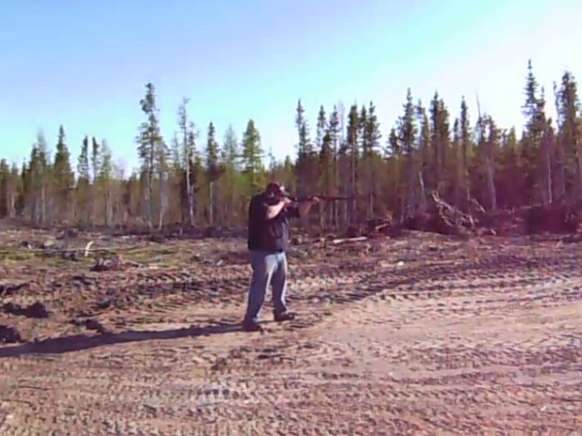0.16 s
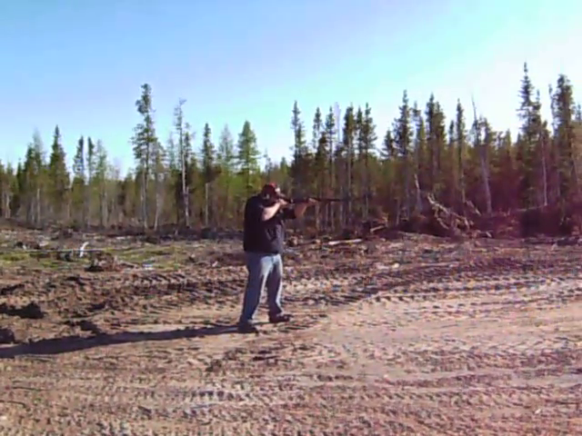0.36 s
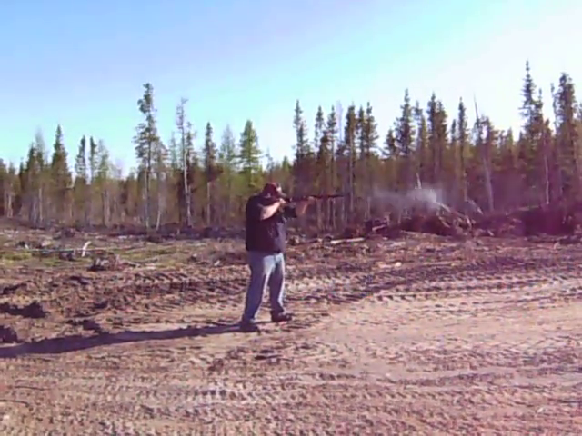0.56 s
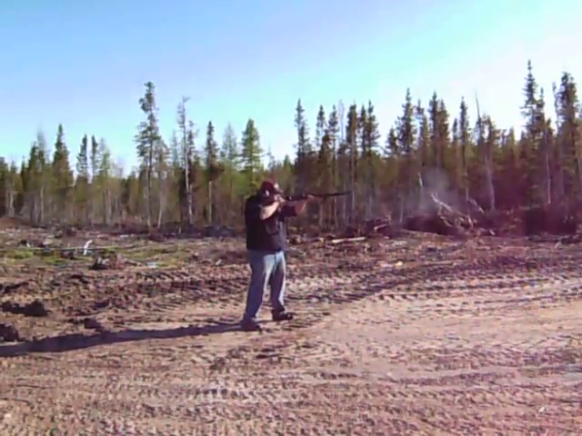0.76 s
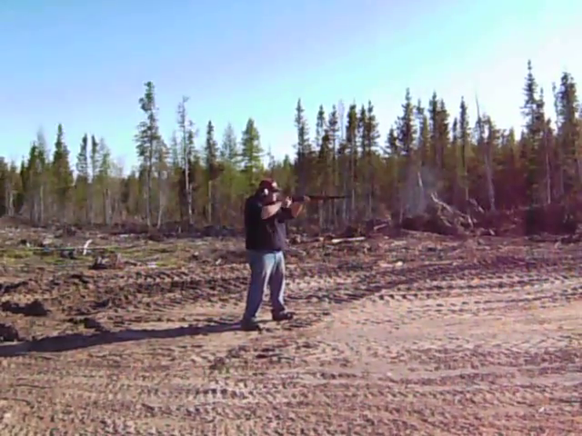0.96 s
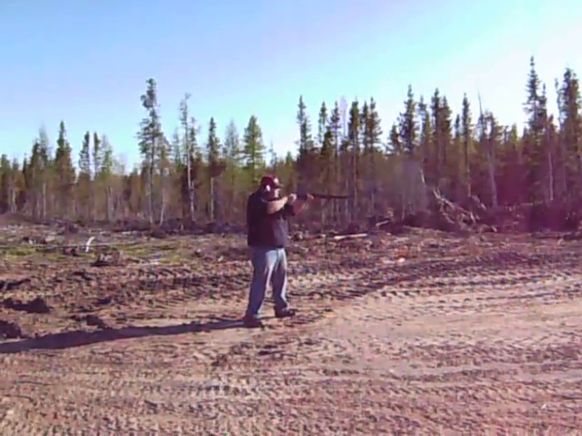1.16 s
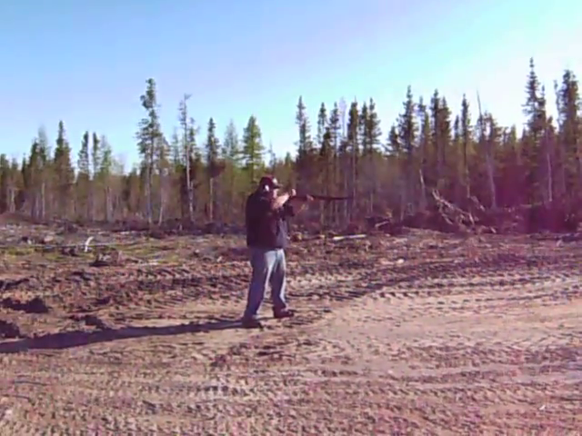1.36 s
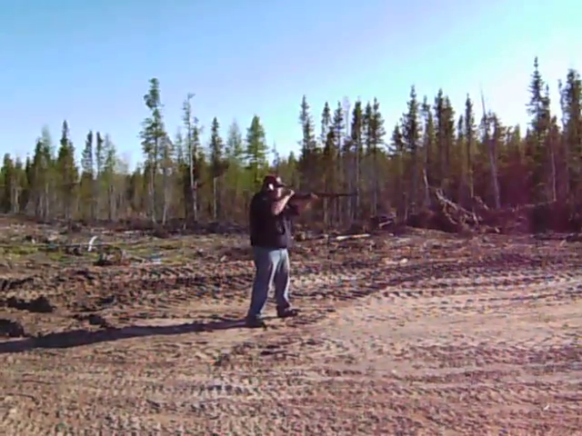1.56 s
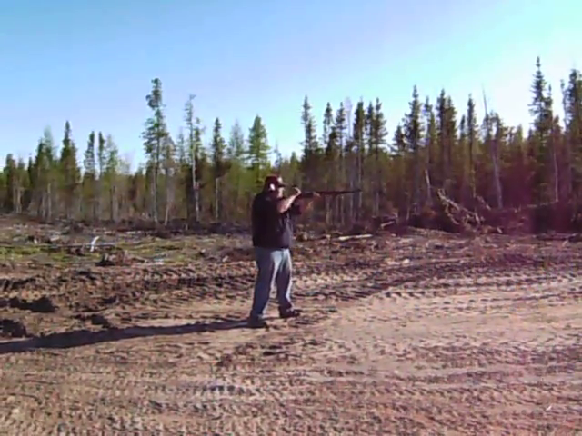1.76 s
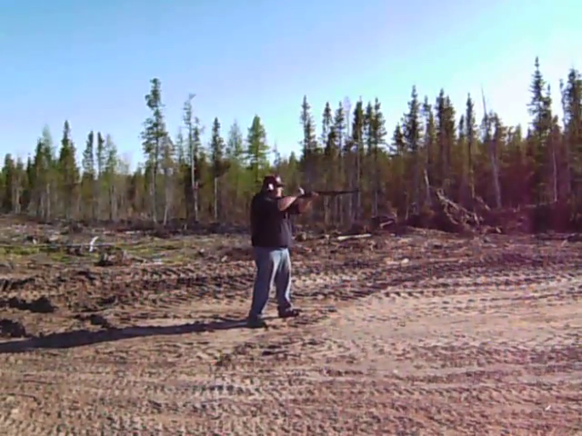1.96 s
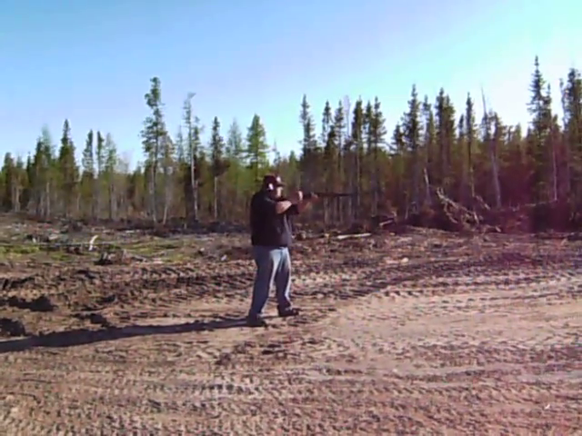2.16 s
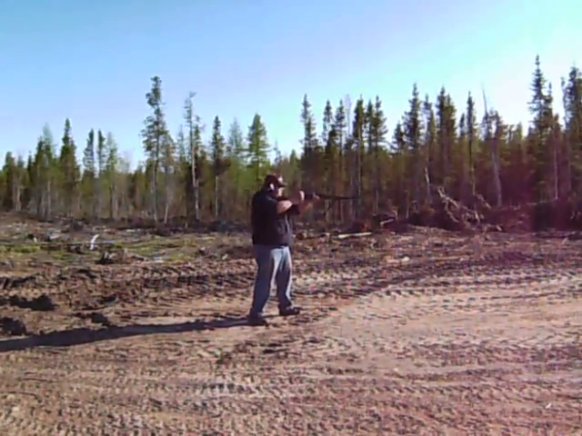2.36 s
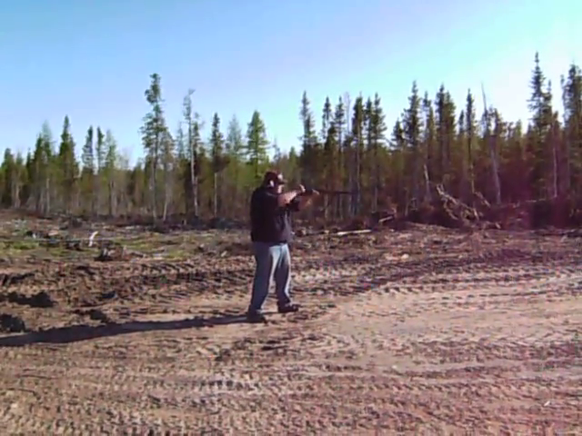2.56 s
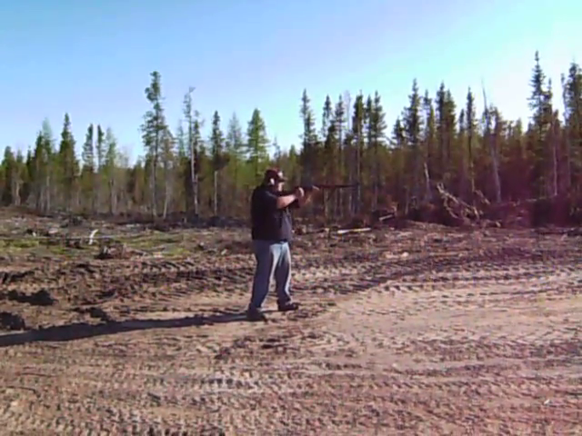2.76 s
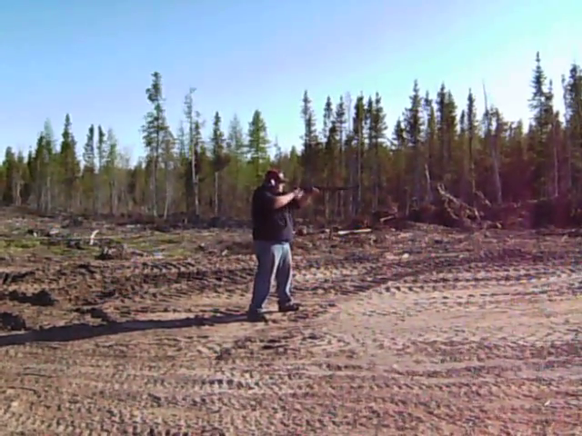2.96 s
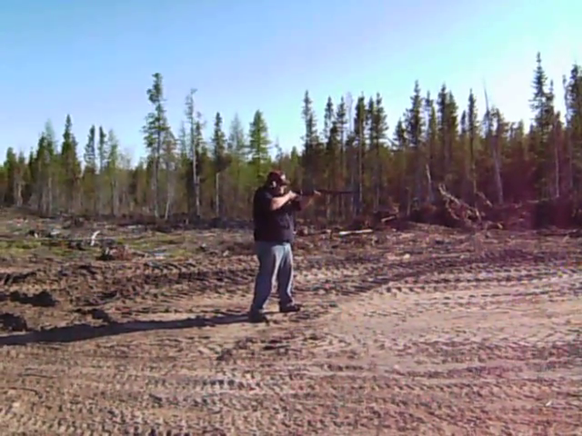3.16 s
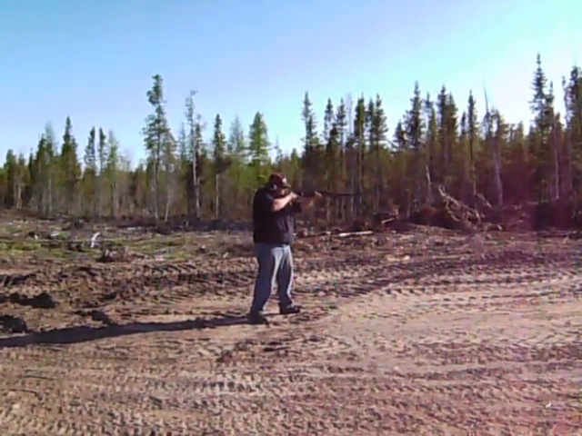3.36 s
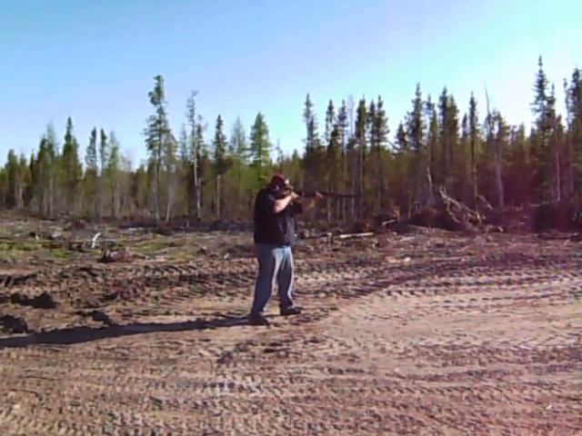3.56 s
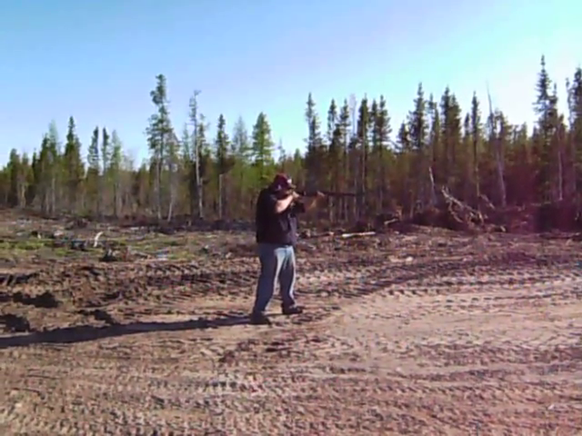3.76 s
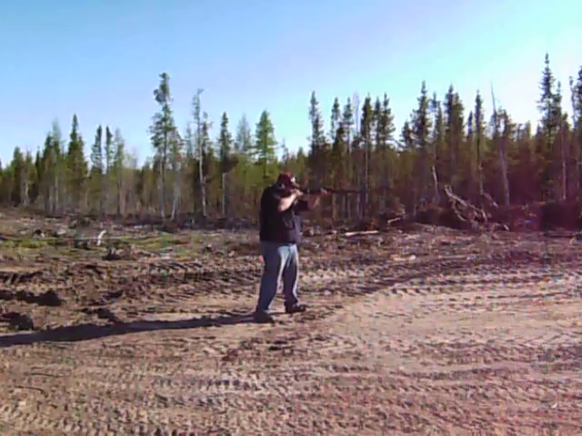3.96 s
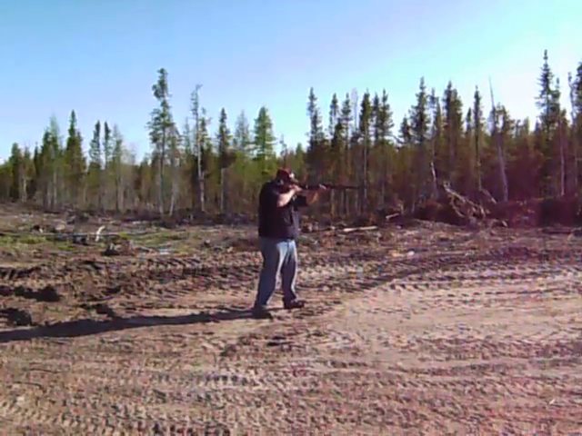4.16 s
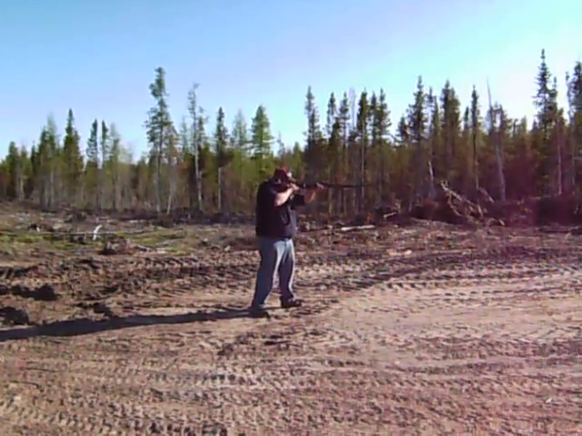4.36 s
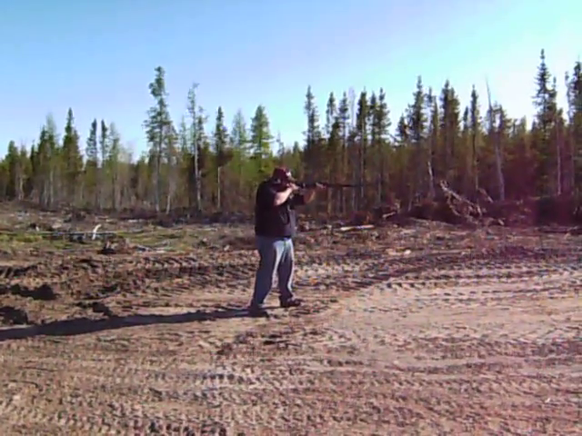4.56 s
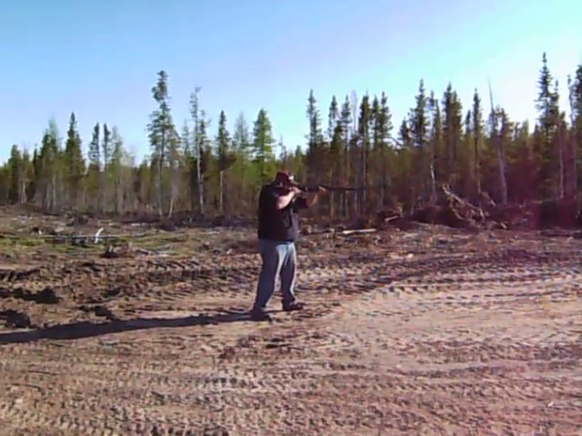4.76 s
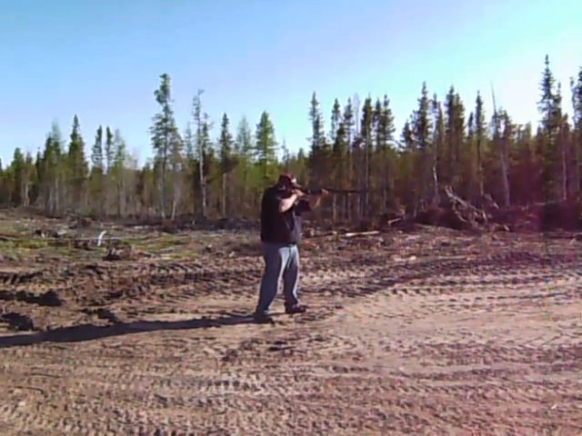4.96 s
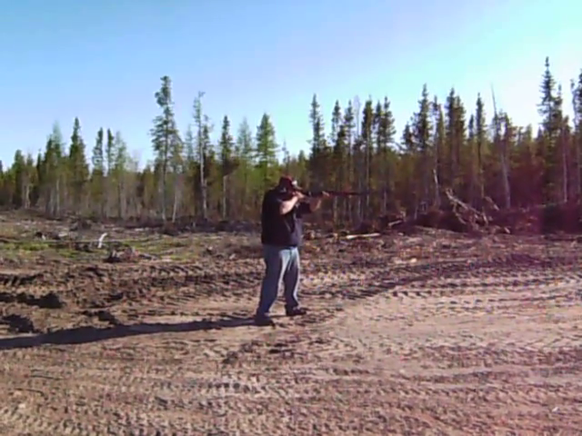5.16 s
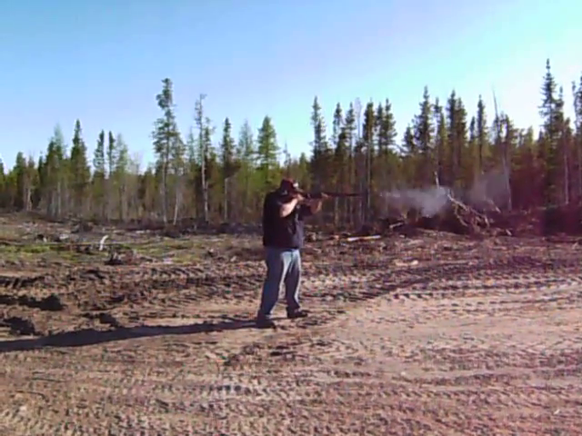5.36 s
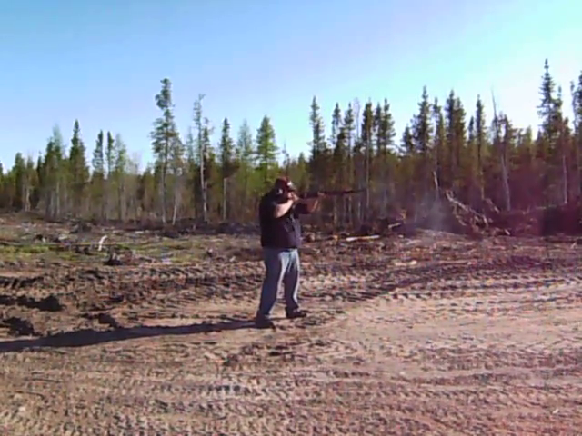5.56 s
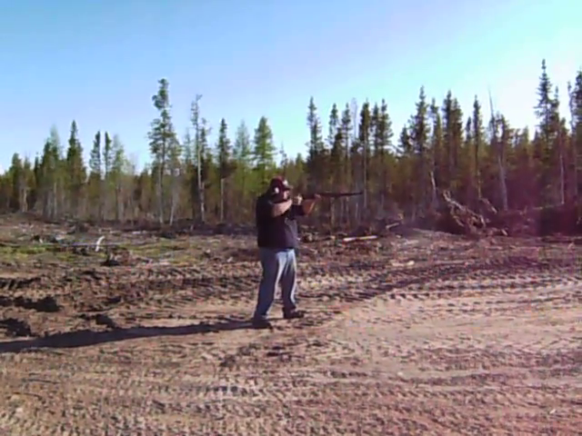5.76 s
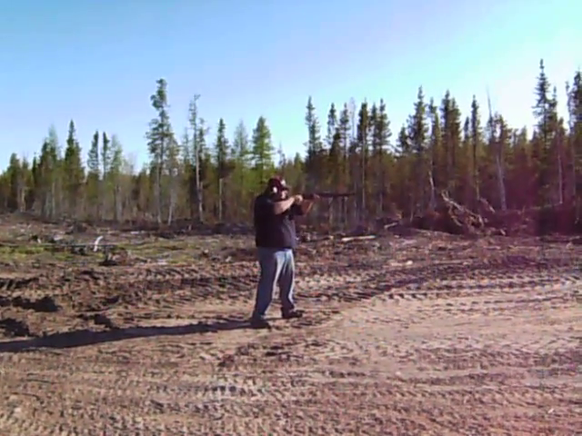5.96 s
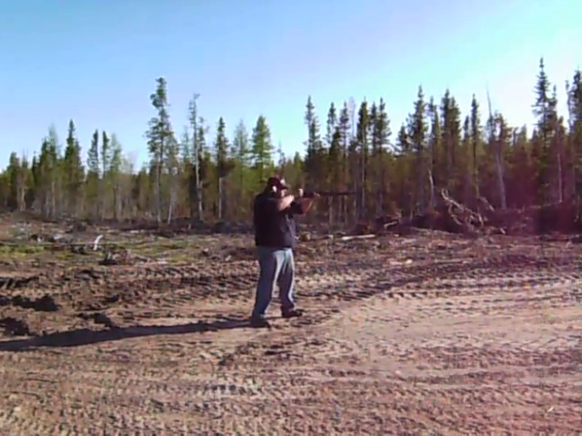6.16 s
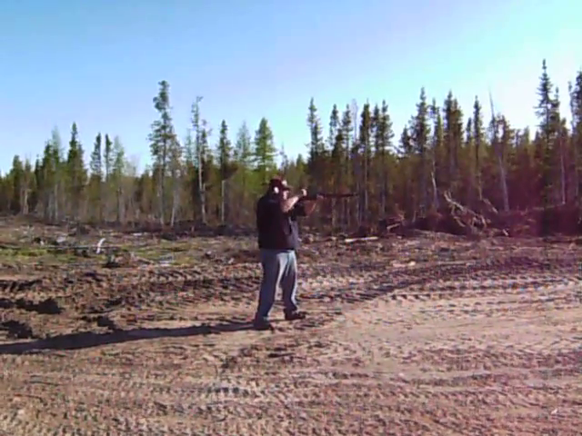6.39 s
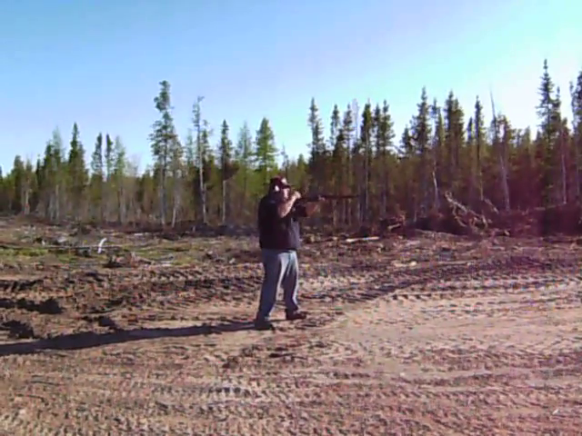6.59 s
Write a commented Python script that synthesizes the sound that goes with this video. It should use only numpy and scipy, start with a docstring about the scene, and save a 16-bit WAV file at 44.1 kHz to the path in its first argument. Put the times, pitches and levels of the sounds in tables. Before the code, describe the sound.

A rifle fires twice in a forest clearing, echoes rolling off the trees, its bolt clacking after each shot as wind buffets the microphone.

```python
"""A forest clearing: two rifle shots, some ten metres from a small microphone that overloads on the blast.
Turbulent muzzle gas makes the crack, the ground booms, and the tree line scatters back a long grainy
roll with a few distinct echoes. After each shot the steel bolt knocks and slides. Wind buffets the
microphone over its own hiss, and two faint bird whistles sound between the shots."""
import sys
import numpy as np
from scipy import signal
from scipy.fft import rfft, irfft
from scipy.io import wavfile
from scipy.ndimage import uniform_filter1d

SR = 44100
rng = np.random.default_rng(int(sys.argv[2]) if len(sys.argv) > 2 else 0)


def to_wav(s):
    """Save 16-bit WAV."""
    ch = np.atleast_2d(s).T  # columns
    pcm = np.round(np.clip(ch, -1, 1) * 32767)  # PCM
    wavfile.write(sys.argv[1], SR, pcm.astype(np.int16))


N = 292383
T = np.arange(N) / SR

# pressure pulses of the wind: (t/s, peak level/dB, relative level of the sharp edge/dB)
WIND_POPS = [(1.745, -31.5, -25), (2.02, -28, -17), (4.32, -48, -19), (4.753, -45, -25), (6.55, -38.5, -26),
             (0.279, -42.5, -27), (0.368, -45, -24), (1.974, -25.5, -24), (2.055, -31, -4),
             (2.143, -33.5, -15), (2.223, -31.5, -15), (2.434, -31.5, -7), (2.474, -30, -27),
             (2.866, -39.5, -19.5), (3.216, -29, 14), (3.244, -35, -10), (3.292, -39, -21),
             (3.332, -31, -15), (3.376, -28, -13), (3.429, -32, -3), (3.481, -28.5, -13), (3.556, -22, -16),
             (3.888, -36, -28), (3.92, -49, -21.5), (4.045, -32, -12), (4.103, -33, -16),
             (4.171, -42, -12.5), (4.387, -45, -26), (4.434, -47, -22.5), (4.622, -39, -23),
             (4.838, -23.5, -7.5), (5.226, -36, -29.5), (6.279, -28.5, -8)]


def undb(db):
    return 10 ** (np.asarray(db) / 20)


def unit(x):
    return x / np.sqrt(np.mean(x ** 2))


def peak(x):
    return x / np.max(np.abs(x))


def band(x, lo_hz, hi_hz, order=2):
    return signal.sosfilt(signal.butter(order, [lo_hz, hi_hz], "band", fs=SR, output="sos"), x)


def below(x, hz):
    """Zero-phase low-pass: subtracting it from x leaves the upper band."""
    return signal.sosfiltfilt(signal.butter(3, hz, fs=SR, output="sos"), x)


def colour(x, points):
    """Spectral shaping by (f/Hz, level/dB) points."""
    hz, db = np.transpose(points)
    f = np.fft.rfftfreq(len(x), 1 / SR) + 1
    return irfft(rfft(x) * undb(np.interp(np.log(f), np.log(hz), db)), len(x))


def grains(rate, spread_db):
    """Poisson impulses of random sign, a few much larger than the rest."""
    chance, sign, size = rng.random((3, N))
    return unit((chance < rate / SR) * np.sign(sign - .5) * undb(-spread_db * np.log(1 - .98 * size)))


def flicker(rate, depth_db):
    """Random modulation: a gain that wanders rate times a second."""
    hold = int(SR / rate)
    steps = np.repeat(rng.standard_normal(N // hold + 1), hold)
    return undb(depth_db * uniform_filter1d(steps, hold)[:N])


def add(out, start, x):
    i = int(start * SR)
    out[i:i + len(x)] += x[:N - i]


def hiss():
    """Self-noise: the microphone adds a steady, coloured noise floor."""
    # noise spectrum: (f/Hz, level/dB)
    spectrum = [(240, -27), (400, -10), (540, -2), (958, -5), (1260, -6), (3490, -5.5), (3940, -9),
                (4400, -28.5), (5720, -76.5), (9680, -120)]
    return undb(-67) * unit(colour(rng.standard_normal(N), spectrum))


def wind():
    """Turbulent pressure at the microphone port: a rumble and a rasp, brighter the harder it blows."""
    # gust strength: (t/s, base level of the rasp/dB)
    gusts = [(0, -85), (.24, -75), (.29, -60), (.48, -64.5), (1.0, -54.5), (1.45, -66.5), (1.75, -45.5),
             (2.0, -47.5), (2.48, -48.5), (2.58, -77.5), (2.8, -80), (2.9, -48.5), (3.08, -68.5),
             (3.2, -51.5), (3.4, -44), (3.56, -47), (3.64, -61), (3.85, -60.5), (4.07, -56.5), (4.4, -63),
             (4.55, -67), (4.72, -68), (4.97, -54), (5.03, -68), (5.1, -56), (5.27, -65.5), (6.1, -58.5),
             (6.63, -64)]
    reference_db, swell_db, swell_s = -48, 5.5, .023
    swells = np.max([np.exp(-((T - at) / swell_s) ** 2) for at, *_ in WIND_POPS], axis=0)
    gust_db = np.interp(T, *np.transpose(gusts)) - reference_db + swell_db * swells
    # rumble spectrum: (f/Hz, level/dB)
    spectrum = [(8.8, -26), (15, -4), (27, -1), (86, -4), (128, -8), (200, -14), (260, -40), (440, -120)]
    puffs = flicker(14, 2.6)
    rumble = unit(colour(rng.standard_normal(N), spectrum) * flicker(25, 1))
    flutter, eddies = flicker(70, 2.7), grains(600, 7.5)
    rasp = unit(below(band(eddies * flutter, 120, 340), 1100))
    edge = unit(below(band(eddies * flutter ** 2.9, 400, 800), 1200))
    return puffs * (undb(-44 + .6 * gust_db) * rumble
                    + undb(reference_db + gust_db) * rasp
                    + undb(-60.5 + 1.3 * gust_db) * edge)


def bolt_knocks():
    """Impact excitation: steel parts snap, ring in damped modes and rattle."""
    # knocks and faint ticks: (t/s, peak level/dB, relative level of the low modes/dB)
    knocks = [(0.179, -47.5, -12), (1.2228, -15.5, -3), (1.4185, -6, -22), (1.563, -36, -15),
              (1.8295, -31, -11), (1.8665, -9.5, -14.5), (1.9884, -46.5, 0), (2.103, -50, -4),
              (2.4832, -39, -3), (2.6222, -27.5, 1), (2.6515, -19.5, -7), (3.4486, -47, -11),
              (6.1815, -21, -10), (6.441, -30, 1), (6.4929, -20.5, -8), (6.5072, -3.5, -20.5),
              (6.5362, -35, -8)]
    # modes of the bolt: (f/Hz, level/dB)
    modes = [(650, -14.5), (1170, -1), (1450, 6), (2300, -16), (2780, -1.5), (3300, -3), (3750, -2.5)]
    out, t = np.zeros(N), T[:SR // 8]
    t60_s = .018
    snap = np.cos(2 * np.pi * 3100 * (t - .0011)) * np.exp(-((t - .0011) / .00045) ** 2)
    for at, db, low_db in knocks:
        ring = np.zeros(len(t))
        for hz, mode_db in modes:
            gain = undb(mode_db + rng.normal(0, 3) + (low_db if hz < 2000 else 0))
            detune = rng.normal(1, .015)
            ring += gain * np.sin(2 * np.pi * hz * detune * t) * undb(-60 * t / t60_s)
        # the parts chatter for a few ms, striking the modes again and again
        chatter = rng.standard_normal(300) * np.exp(-t[:300] / .0021) * np.minimum(t[:300] / .001, 1)
        ring = peak(band(np.convolve(ring, chatter)[:len(t)], 550, 4900, order=4))
        rattle = unit(band(rng.standard_normal(len(t)), 1679, 3700)) * np.exp(-t / .01)
        add(out, at, undb(db) * peak(snap + undb(-3) * ring + undb(-23) * rattle))
    return out


def bolt_slides():
    """Sliding friction: dense tiny impacts of bolt on receiver merge into a scrape."""
    # one faint scuff, then the slides: (start t/s, end t/s, level/dB, centre f/Hz, relative bandwidth)
    slides = [(0.264, 0.282, -56, 1500, 0.9), (1.719, 1.755, -39.5, 3070, 0.36),
              (1.725, 1.748, -41.5, 1420, 0.23), (1.835, 1.865, -47.5, 3480, 0.6),
              (6.173, 6.19, -40.5, 3220, 0.32), (6.221, 6.418, -46, 3430, 0.16),
              (6.482, 6.508, -45, 3320, 0.33)]
    out, friction = np.zeros(N), grains(2500, 1.8)
    for start, end, db, hz, width in slides:
        n = int((end - start) * SR)
        scrape = unit(band(friction[:n], hz * (1 - width / 2), hz * (1 + width / 2)))
        add(out, start, undb(db) * signal.windows.tukey(n, .5) * scrape)
    return out


def wind_pops():
    """Pressure transients at the port: a blunt push and pull, a sharp edge and a slow thud."""
    out, t = np.zeros(N), T[:SR // 20]
    blunt, sharp = (u * np.exp(-u ** 2 / 2) for u in (t / .000596 - 3, (t - .0018) / .00024))
    thud = undb(-9) * np.sin(2 * np.pi * 70 * t) * np.exp(-t / .006)
    for at, db, sharp_db in WIND_POPS:
        pop = peak(blunt + undb(sharp_db) * sharp + thud)
        add(out, at - .001, undb(db) * rng.choice([-1, 1]) * pop)
    return out


def blasts(shots):
    """Jet noise: turbulent gas leaves the muzzle, and the treble dies before the lower bands."""
    # blast bands: (centre f/Hz, width/Hz, relative level/dB, hold t/s, decay t/s)
    bands = [(2780, 1700, -5, 0.0012, 0.00041), (1413, 700, -10, 0.0055, .0015),
             (751, 400, -3, 0.0049, 0.0012), (235.2, 340, -8, 0.0061, 0.00046),
             (89.1, 300, -14, 0.004, 0.0033)]
    out, t = np.zeros(N), T[:SR // 10]
    rise = np.minimum(t / .0008, 1)
    for at, shot_db in shots:
        for hz, width, db, hold, decay in bands:
            gas = unit(band(rng.standard_normal(len(t)), max(hz - width / 2, 20), hz + width / 2))
            envelope = rise * np.exp(-np.maximum(t - hold, 0) / decay)
            add(out, at, undb(shot_db + db) * gas * envelope)
    return out


def roll(shots):
    """Scattering: each trunk returns a click, the far ones duller, over the boom of the ground."""
    # envelopes: (delay t/s, tree line level/dB, its treble level/dB, ground level/dB)
    envelopes = [(.01, -19, -24.5, -24.5), (.035, -29, -34, -25.5), (.07, -26, -34.5, -21),
                 (0.107, -28, -28.5, -19), (.125, -28.5, -26.5, -19), (.143, -37, -33.5, -30),
                 (.155, -33, -25.5, -31), (.17, -31, -21, -27.5), (.22, -32, -22, -31),
                 (.25, -28.5, -28.5, -38), (.275, -25.5, -22, -41), (.325, -29.5, -19.5, -45),
                 (.35, -28, -25.5, -40.5), (.385, -24.5, -21.5, -45), (.46, -30, -24.5, -43),
                 (0.699, -33, -35, -52), (.95, -39, -43.5, -62.5), (1.3, -49, -55, -80),
                 (1.9, -64.5, -66, -98), (2.2, -70, -76, -99)]
    # spectra of the tree line and the ground boom: (f/Hz, level/dB)
    tree_spectrum = [(280, -53), (480, -11), (652, 3.5), (763, 2), (1290, -6), (2140, -6.5), (2480, -9.5),
                     (3520, -9.5), (3900, -16.5), (4400, -29.5), (5720, -62.5), (9680, -120)]
    boom_spectrum = [(29, -55.5), (50, -16.5), (225, -0.5), (265, -5.5), (347, -1.5), (405, -20),
                     (500, -8.5), (650, -42), (1100, -120)]
    delays, *levels = np.transpose(envelopes)
    t = np.arange(delays[0], delays[-1], 1 / SR)
    n = len(t)
    mid_gain, treble_gain, boom_gain = (undb(np.interp(t, delays, db)) for db in levels)
    trunks = colour(grains(4000, 3.3) * flicker(40, .71), tree_spectrum)
    mid, top = below(trunks, 1200), trunks - below(trunks, 2500)
    upper = trunks - mid - top
    air_loss_db_per_s = 15  # longer paths lose more of the top band
    treble = (upper[:n] + undb(5 - air_loss_db_per_s * t) * top[:n]) / np.std(upper + top)
    boom = unit(colour(grains(2000, 4.1), boom_spectrum))
    rise = np.minimum((t - t[0]) / .003, 1)
    response = rise * (mid_gain * unit(mid)[:n] + treble_gain * treble + boom_gain * boom[:n])
    out = np.zeros(N)
    for at, _ in shots:
        add(out, at + delays[0], response)
    return out


def echoes(shots):
    """Reflection: each large surface returns a blast as one short burst."""
    # strong reflections: (delay t/s, peak level/dB, f/Hz, decay t/s)
    reflections = [(.15, -14, 2050, .002), (.205, -18, 750, .005), (.228, -6.5, 691, .005),
                   (.245, -16, 2000, .002), (.268, -9.5, 2900, .004), (.268, -15.5, 970, .003),
                   (.316, -7, 2402, .005), (.335, -24.5, 250, 0.0089), (.376, -12, 740, 0.0023),
                   (.389, -12, 925, .002), (.445, -12.5, 2200, .004), (.571, -21, 825, 0.0019),
                   (.581, -21.5, 810, 0.0033), (.685, -20.5, 894, 0.0039)]
    out, t = np.zeros(N), T[:SR // 20]
    for delay, db, hz, decay in reflections:
        noise = band(rng.standard_normal(len(t)), hz * .92, min(hz * 1.14, 4000))
        burst = undb(db) * peak(noise * np.minimum(t / .0027, 1) * np.exp(-t / decay))
        for at, _ in shots:
            add(out, at + delay, burst)
    return out


def birds():
    """Multipath scattering: the trees blur far whistles into narrow bands of noise."""
    # whistles: (start t/s, end t/s, f/Hz, width/Hz, level/dB)
    calls = [(3.887, 4.22, 1940, 203, -72), (4.746, 4.957, 3130, 77.8, -71.5)]
    out = np.zeros(N)
    for start, end, hz, width, db in calls:
        n = int((end - start) * SR)
        whistle = unit(band(rng.standard_normal(n), hz - width / 2, hz + width / 2))
        add(out, start, undb(db) * signal.windows.tukey(n, .6) * whistle)
    return out


def scene():
    """Superposition: all sources add in one channel."""
    # muzzle blasts: (t/s, level/dB)
    shots = [(.5105, 6), (5.3244, 6)]
    return (hiss() + wind() + bolt_knocks() + bolt_slides() + wind_pops()
            + blasts(shots) + roll(shots) + echoes(shots) + birds())[None]


def record(dry):
    """Clipping and band limiting: the capsule overloads, filters cut treble, the converter clips peaks."""
    capsule_max, converter_max = .69, .72
    mic_top_hz, output_top_hz = 4247, 16300
    mic = np.clip(dry, -capsule_max, capsule_max)
    mic = signal.sosfilt(signal.cheby1(10, .5, mic_top_hz, fs=SR, output="sos"), mic)
    mic = signal.sosfilt(signal.butter(2, 4000, fs=SR, output="sos"), mic)
    mic = np.clip(mic, -converter_max, converter_max)
    return signal.sosfilt(signal.ellip(8, .2, 70, output_top_hz, fs=SR, output="sos"), mic)


dry = scene()
out = record(dry)
to_wav(out)
```